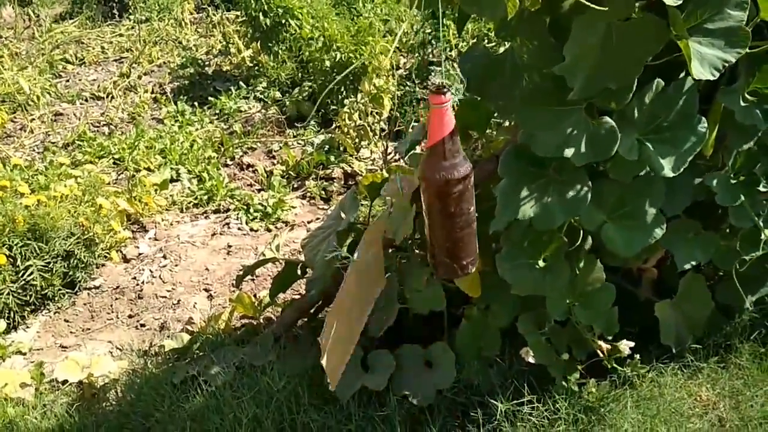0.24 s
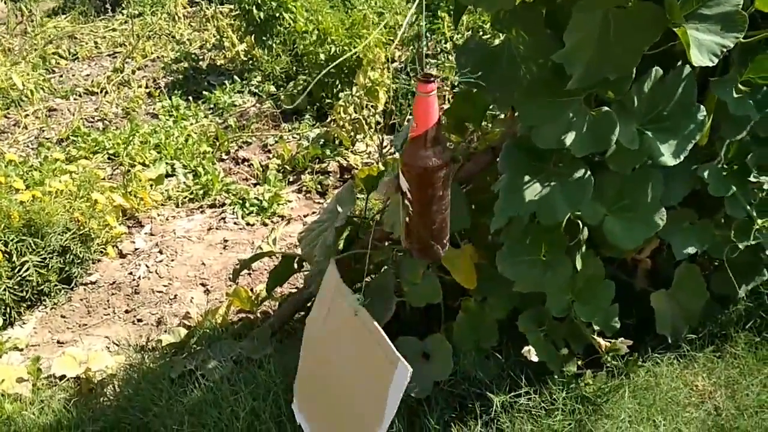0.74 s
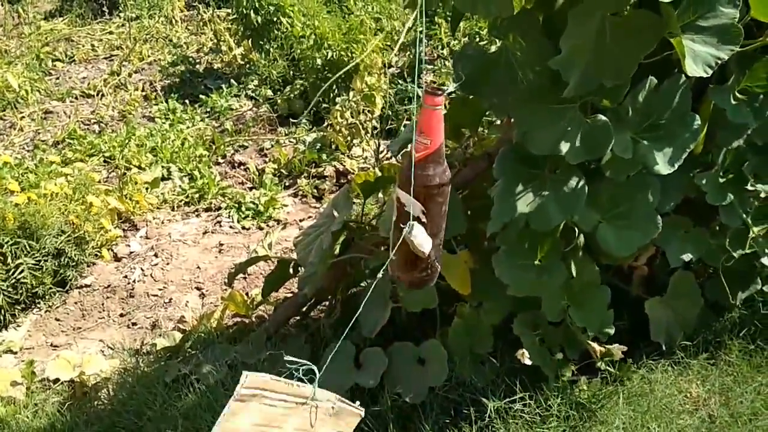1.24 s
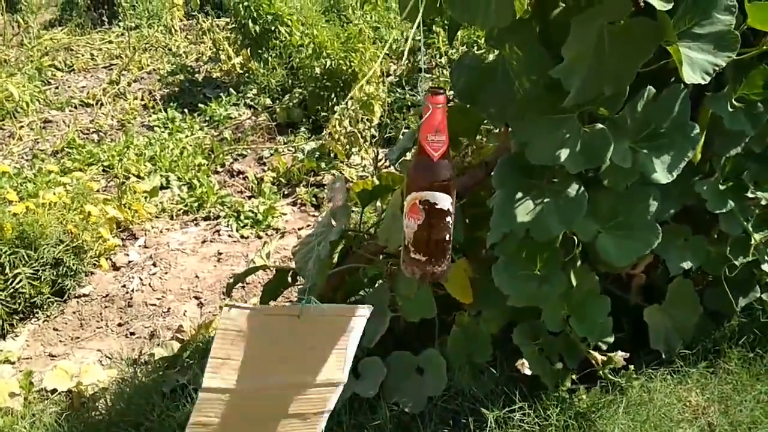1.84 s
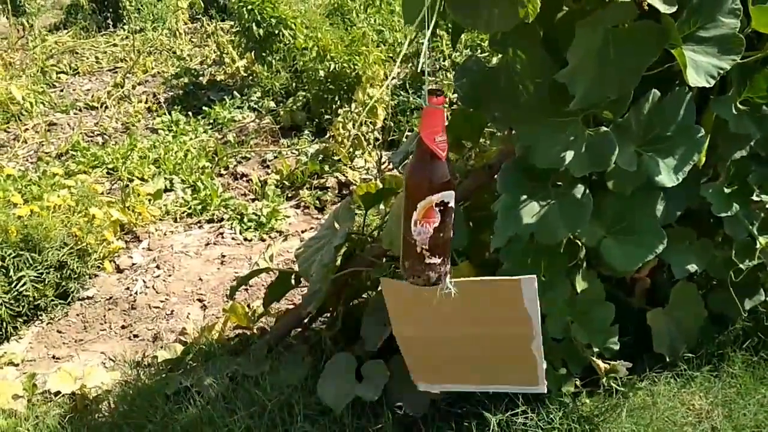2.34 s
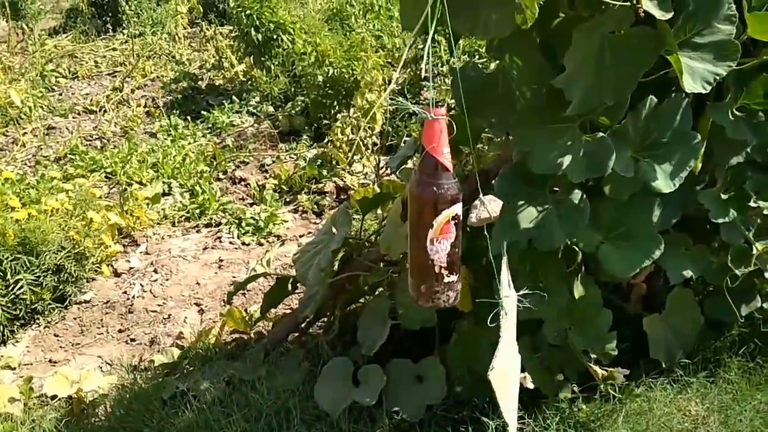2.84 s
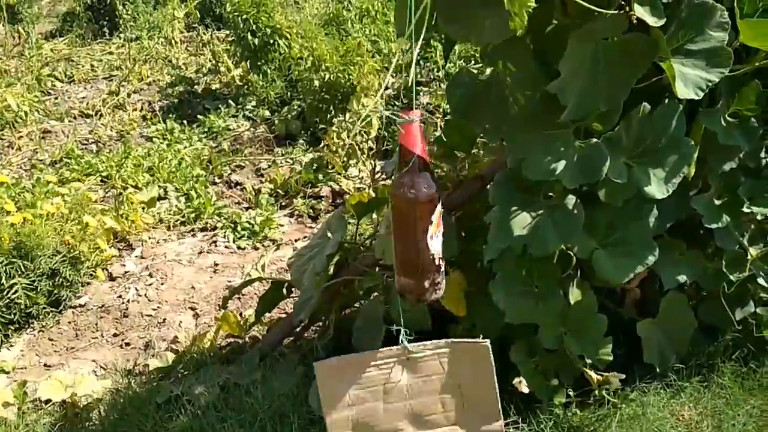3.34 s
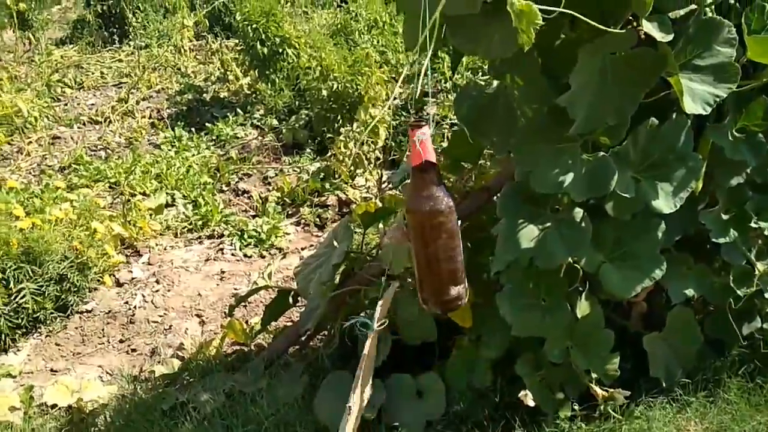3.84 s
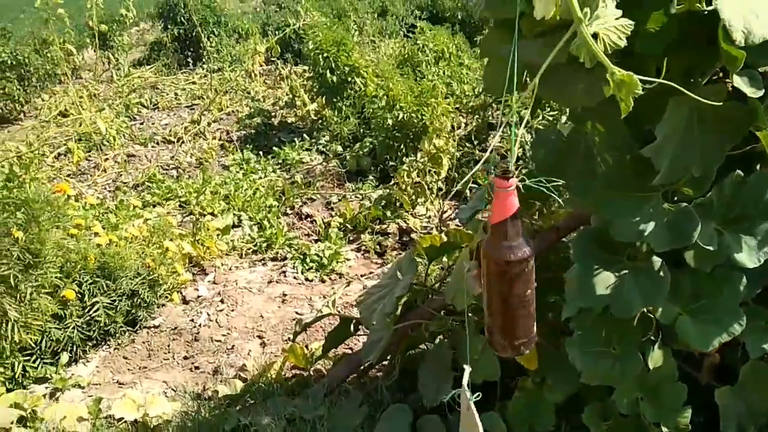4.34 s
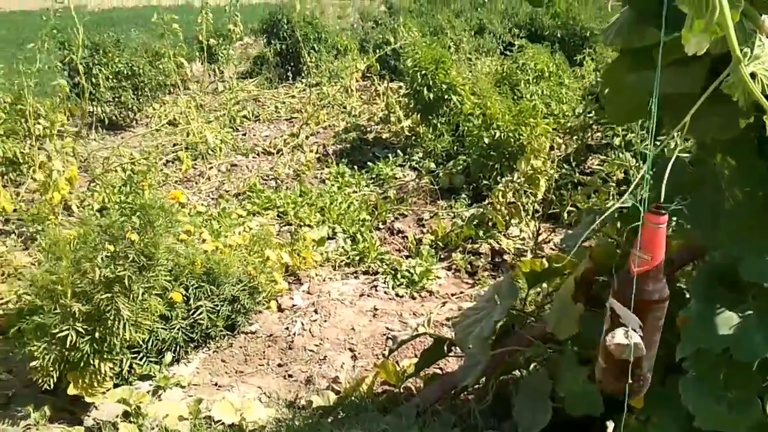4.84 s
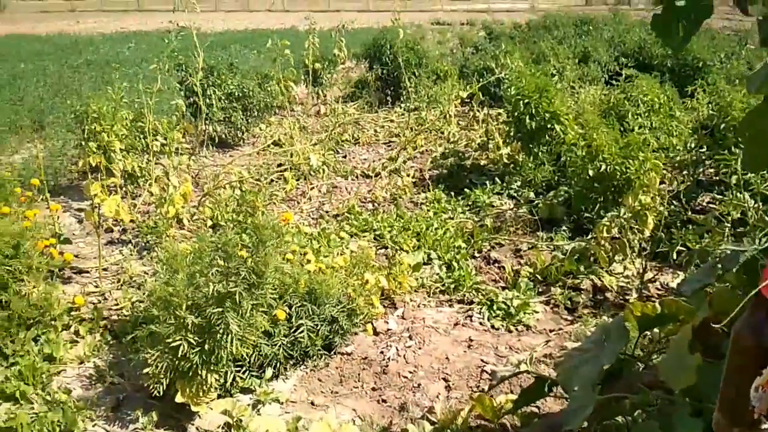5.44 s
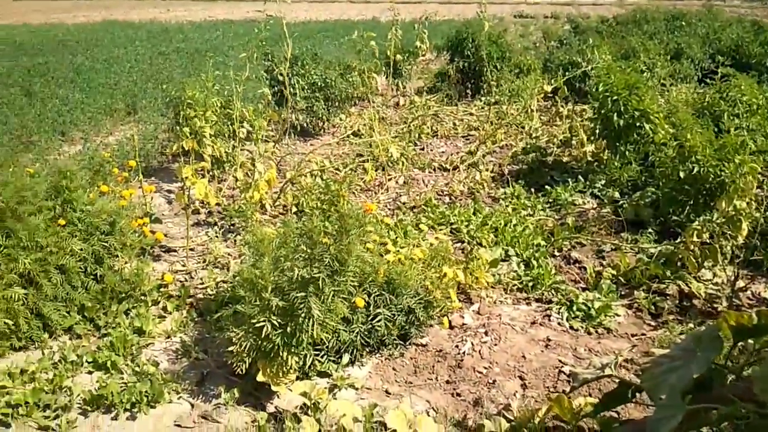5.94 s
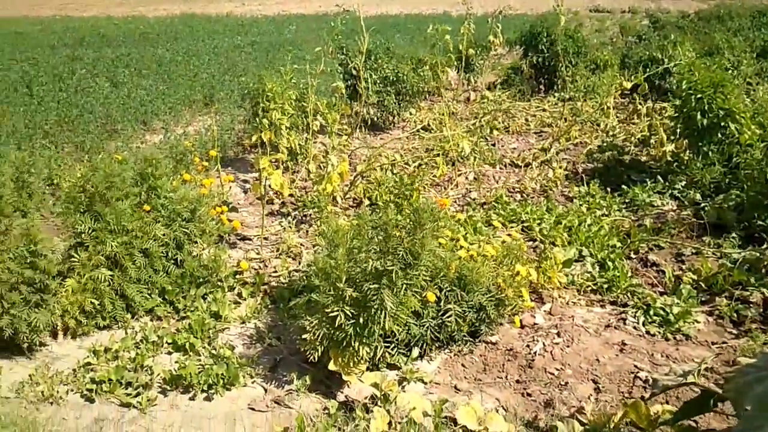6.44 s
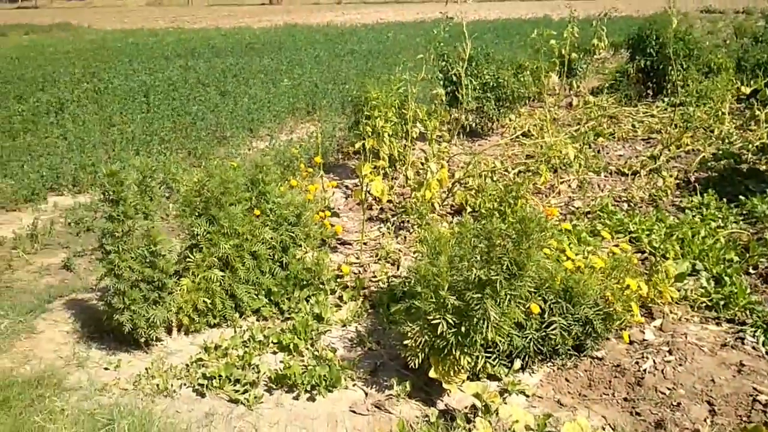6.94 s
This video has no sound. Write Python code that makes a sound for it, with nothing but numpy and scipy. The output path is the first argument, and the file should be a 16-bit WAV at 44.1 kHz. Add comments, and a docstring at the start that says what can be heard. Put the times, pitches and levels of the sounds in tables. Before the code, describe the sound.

Outdoors in a quiet field, wind thumps and rumbles against the microphone, strongest in the first two seconds. A stone strikes a hanging glass bottle with dry, bright, quickly fading clinks, unevenly spaced, some followed by tiny chattering rebounds. The middle is calmer, with clearer clinks; later come light puffs, a dull bump at right, faint cricket ticks and weak rattles with a short scrape. The sound sits almost entirely on the left.

```python
"""First a puff of wind rumbles at the left over a thin insect hiss; soon a stone clinks on a glass bottle.
The bottle hangs on a string in a field, and the stone, swung by a cardboard sail, strikes and chatters.
Each touch is a push of air, a crack of noise and decaying sines; ground and leaves answer softly.
Wind, hiss, ticks and the drone far away are shaped noise; a faint far whine is a few blurred tones.
Gusts buffet the microphone, whose right port is nearly deaf but takes one bump."""
import sys
import numpy as np
from scipy import signal
from scipy.fft import rfft, irfft, next_fast_len
from scipy.io import wavfile
from scipy.ndimage import uniform_filter1d, map_coordinates

SR = 44100
rng = np.random.default_rng(int(sys.argv[2]) if len(sys.argv) > 2 else 0)


def wrap_up_sound(samples):
    """Save the sound to the file named by the first command line argument, as 16-bit audio."""
    columns = np.atleast_2d(samples).T
    # keep every value between -1 and 1, then stretch to whole-number steps
    tamed = np.clip(columns, -1, 1)
    steps = np.round(tamed * 32767).astype(np.int16)
    wavfile.write(sys.argv[1], SR, steps)


N = 316197  # length of the scene in samples


def amp(db):
    """Turn decibels into a gain."""
    return 10 ** (np.asarray(db) / 20)


def unit(x):
    """Scale a sound to rms 1."""
    return x / np.sqrt(np.mean(x ** 2) + 1e-20)


def along(points, hz):
    """Read a curve of (frequency [Hz], value) points, with frequency on a log axis."""
    point_hz, value = np.transpose(points)
    return np.interp(np.log(hz + 1), np.log(point_hz + 1), value)


def curve(rows):
    """Join (time [s], level [dB]) rows into one gain per sample, silent outside them."""
    return amp(np.interp(np.arange(N) / SR, *np.transpose(rows), left=-np.inf, right=-np.inf))


def wobble(rate):
    """Draw a smooth random curve with this many knots a second."""
    knots = rng.standard_normal(int(N * rate / SR) + 4)
    return map_coordinates(knots, [np.arange(N) * rate / SR])


def filtered(x, response):
    """Multiply the spectrum of a sound by a response of frequency."""
    size = next_fast_len(N + SR // 2)
    spectrum = rfft(x, size) * response(np.fft.rfftfreq(size, 1 / SR))
    return irfft(spectrum, size)[..., :N]


def noise(spectrum):
    """Make coloured noise of rms 1."""
    return unit(filtered(rng.standard_normal(N), lambda hz: amp(along(spectrum, hz))))


def add(track, s, sound):
    """Mix a sound into a track from time s on."""
    start = max(round(s * SR), 0)
    track[start:start + len(sound)] += sound[:N - start]


def envelope(s, db, rise_s, fall_s, hold_s=0):
    """Gain that peaks at time s and holds; rise and fall are the times for 20 dB."""
    t = np.arange(N, dtype=np.float32) / SR - s
    away = np.maximum(-t / rise_s, 0) + np.maximum((t - hold_s) / fall_s, 0)
    return amp(db) * np.exp(-np.log(10) * np.minimum(away, 20))


# colour of the air over the field: (frequency [Hz], relative level per Hz [dB])
FIELD_COLOUR = [(20, 3), (100, 2), (250, -13.5), (600, -15.5), (1100, -19.5), (2000, -28.5), (3500, -37.5),
                (9000, -33), (11000, -39), (16000, -42)]


def field_air():
    """Air noise, made patchy by random swells that differ over time and pitch."""
    z = signal.stft(noise(FIELD_COLOUR), nperseg=1024)[2]
    patches = uniform_filter1d(rng.standard_normal(z.shape), size=4, axis=0)  # neighbouring pitches
    patches = unit(uniform_filter1d(patches, size=12, axis=1))  # neighbouring moments
    bands_hz = np.linspace(0, SR / 2, len(z))
    depth_db = along([(100, 0.85), (500, 2.8), (1400, 4), (3000, .5)], bands_hz)
    patchy = signal.istft(z * amp(depth_db[:, None] * patches), nperseg=1024)[1][:N]
    return amp(-74.5 + 0.35 * wobble(7.4)) * patchy


# colour of the far drone: (frequency [Hz], relative level per Hz [dB])
DRONE_COLOUR = [(15, -35), (33, -15), (44, 2), (56, -15.5), (90, -20), (200, -44), (600, -88.5)]


def drone():
    """A steady low drone: noise gathered in a narrow low band."""
    return amp(-65.5) * noise(DRONE_COLOUR)


# swells of the far whine, before blurring:
#   (peak time [s], length between the points 20 dB down [s], pitch [Hz], peak level [dB])
WHINE_SWELLS = [(.56, .4, 1253, -73), (.72, .2, 946.4, -75), (1.25, 0.31, 954, -71.5),
                (1.44, 0.38, 885, -69), (2.67, 0.55, 935, -79), (3.63, 0.2, 927, -82)]


def far_whine():
    """Faint tones that come and go, blurred by multiplying them with slow noise."""
    t = np.arange(N) / SR
    whine = np.zeros(N)
    for s, length_s, hz, db in WHINE_SWELLS:
        whine += envelope(s, db, length_s / 2, length_s / 2) * np.sin(2 * np.pi * hz * t)
    blur = noise([(5, 2.5), (35, -3.5), (100, -15), (250, -25.5), (500, -90.5)])
    return blur * whine


# thin hiss of insects, before its flutter: (time [s], time held at full level [s], level [dB])
INSECT_HISSES = [(0, 0.76, -76.5), (1.265, 0.027, -78), (1.82, .005, -80)]
# ticks of a bush cricket, before a shared lift: (time [s], level [dB])
CRICKET_TICKS = [(6.374, -65), (6.4432, -56.5), (6.5124, -50.5), (6.582, -55), (6.6495, -59),
                 (6.7187, -63.5)]
# colour of both: (frequency [Hz], relative level per Hz [dB])
HISS_COLOUR = [(6000, -38), (9000, -20.5), (11500, -19.5), (12300, 1.5), (15000, 2), (16000, -5.5)]


def insects():
    """A thin fluttering hiss, and later a short even row of very high ticks, all cut from one noise."""
    ticks = np.zeros(N)
    t = np.arange(SR // 20) / SR
    snap = t / 0.0019 * np.exp(1 - t / 0.00044)
    tail = amp(-29.0) * np.exp(-t / 0.01)
    for s, db in CRICKET_TICKS:
        add(ticks, s - .001, amp(db + 9) * (snap + tail))
    hiss = np.zeros(N)
    for s, length_s, db in INSECT_HISSES:
        hiss += envelope(s, db, rise_s=.02, fall_s=0.031, hold_s=length_s)
    flutter = amp(1.2 * wobble(150))
    return (hiss * flutter + ticks) * noise(HISS_COLOUR)


# colours of slow and fast air at a port: (frequency [Hz], relative level per Hz [dB])
BREEZE_COLOUR = [(10, -5), (30, 3.5), (60, -4), (110, -14.5), (200, -29.5), (400, -45), (1000, -60),
                 (3000, -87)]
GALE_COLOUR = [(10, -8.5), (40, 4.5), (110, -2), (200, -17.5), (320, -29), (500, -44), (1000, -69),
               (3500, -102)]


def buffet(db, gale_db, lumps_db):
    """Turbulence at one port: faster air is louder with another colour, and its middle range spurts."""
    share = 1 / (1 + np.exp((gale_db - db) / 6))  # at gale_db, breeze and gale are equal
    flow = np.sqrt(1 - share) * noise(BREEZE_COLOUR) + np.sqrt(share) * noise(GALE_COLOUR)
    power = uniform_filter1d(uniform_filter1d(flow ** 2, size=1800), size=1800)
    swell = np.sqrt(np.abs(power))  # dividing by this makes the level follow db
    fine = filtered(flow, lambda hz: hz ** 4 / (hz ** 4 + 200 ** 4) / (1 + (hz / 550) ** 4))
    spurts = unit(amp(lumps_db * wobble(55)))
    return amp(db) * (flow + fine * (spurts - 1)) / swell


# two long gusts, a list of rows each, before the port settings below: (time [s], strength [dB])
LONG_GUSTS = [
    [(0.4, -82), (0.476, -45), (0.7, -20), (0.782, -31.5), (0.804, -22.5), (0.836, -37.5), (0.874, -27),
     (1.172, -46), (1.19, -36.5), (1.3, -33.5), (1.37, -58), (1.456, -39.5), (1.608, -32), (1.8, -75)],
    [(5.5, -71), (5.574, -43), (5.71, -43), (5.728, -54.5), (5.842, -52.5), (5.912, -60), (5.958, -44.5),
     (6.13, -71.5), (6.42, -46.5), (6.458, -60.5), (6.534, -44.5), (6.646, -75), (6.718, -46), (6.85, -72)],
]
GUST_LEFT_DB, GUST_RIGHT_DB = 6, -18.5  # how hard they hit each port
CALM_LEFT_DB, CALM_RIGHT_DB = -71.5, -77  # light air that is always there, before its swing
CALM_SWING_DB = 4
# short separate puffs:
#   (peak time [s], length between the points 20 dB down [s], left level [dB], right level [dB])
WIND_PUFFS = [(.005, 0.12, -35, -44), (0.095, 0.063, -35, -65), (0.262, 0.12, -32, -55),
              (1.85, 0.079, -52.5, -68), (1.96, 0.073, -53, -69), (3.65, 0.12, -61, -50.5),
              (3.87, .13, -51.5, -78), (3.962, 0.14, -40.5, -70), (4.3, .15, -50.5, -75),
              (4.647, 0.19, -53, -55.5), (5.064, 0.094, -44.5, -75), (5.222, 0.098, -37.5, -53),
              (5.375, 0.36, -42.5, -52.5), (6.89, .1, -51, -75), (7.091, 0.1, -45.5, -70)]
PUFF_RISE = .42  # share of a puff's length that it spends rising
# the strongest eddies that hit the left port: (peak time [s], frequency [Hz], peak level [dB])
LEFT_EDDIES = [(.251, 55, -16.5), (.271, 45, -21), (0.637, 60, -16), (.678, 70, -14.5), (.705, 70, -8.5),
               (0.7112, 150, -20.5), (.741, 40, -12), (0.8036, 65, -8), (.888, 75, -18), (.923, 45, -11.5),
               (0.964, 40, -15), (.984, 55, -15.5), (1.222, 35, -20), (1.283, 38, -13.5),
               (1.609, 40, -19.5), (6.76, 105, -44)]


def wind():
    """Gusts, puffs and light air rumble at both ports; single eddies push or pull sharply at the left."""
    gust = sum(curve(rows) for rows in LONG_GUSTS)
    # the layers of wind add up as powers
    left_power = (amp(GUST_LEFT_DB + 1.9 * wobble(22)) * gust) ** 2
    left_power += amp(CALM_LEFT_DB + CALM_SWING_DB * wobble(5)) ** 2
    right_power = (amp(GUST_RIGHT_DB + 3.1 * wobble(14)) * gust) ** 2
    right_power += amp(CALM_RIGHT_DB + CALM_SWING_DB * wobble(9)) ** 2
    for s, length_s, left_db, right_db in WIND_PUFFS:
        puff = envelope(s, 0, PUFF_RISE * length_s, (1 - PUFF_RISE) * length_s)
        left_power += (amp(left_db) * puff) ** 2
        right_power += (amp(right_db) * puff) ** 2
    left = buffet(10 * np.log10(left_power), gale_db=-26, lumps_db=8.0)
    right = buffet(10 * np.log10(right_power), gale_db=-54, lumps_db=6)
    t = np.arange(SR // 8) / SR - 1 / 16
    for s, hz, db in LEFT_EDDIES:
        u = (2 * np.pi * hz * t) ** 2
        shape = np.hanning(len(t)) * (1 - u) / (1 + u) ** 2
        add(left, s + t[0], rng.choice([-1, 1]) * amp(db) * shape)
    return np.array([left, right])


BUMP_S, BUMP_DB, RUB_DB = 5.342, -20.5, -49  # time [s] and peak levels [dB]
# colour of the bump: (frequency [Hz], relative level per Hz [dB])
THUD_COLOUR = [(15, -6), (50, 8), (110, -16), (200, -24.5), (400, -43), (700, -34), (1200, -53),
               (3000, -60), (7000, -58.5), (9000, -63), (15000, -75)]


def port_bump():
    """A dull bump against the right port with a short, much weaker rub after it, cut from one noise."""
    bump = envelope(BUMP_S, BUMP_DB, rise_s=.0037, fall_s=.018)
    rub = envelope(BUMP_S, RUB_DB, rise_s=0.0038, fall_s=0.026, hold_s=0.063)
    return (bump + rub) * noise(THUD_COLOUR)


# echo from the foliage: (frequency [Hz], time to fade by 60 dB [s])
LEAF_FADES = [(300, 0.078), (1500, 0.051), (5000, 0.21), (14000, 0.086)]
GROUND_S = .0099  # delay of the bounce off the ground [s]


def echo(x, wet_db, ground_s, ground_db):
    """One bounce off the ground, and a short noisy scatter from the leaves."""
    hz, t, z = signal.stft(rng.standard_normal(SR // 5), SR, nperseg=256)
    fade = amp(-60 * t / along(LEAF_FADES, hz)[:, None])
    tail = signal.istft(z * fade, SR, nperseg=256)[1]
    response = amp(wet_db) * tail / np.linalg.norm(tail)
    response[0] = 1  # the direct sound
    response[round(ground_s * SR)] += amp(ground_db)
    return signal.fftconvolve(x, response)


DRAG_S, DRAG_DB, DRAG_FADE_S = 6.7, -73, 0.32  # the level is before the uneven wobble
# colour of the drag: (frequency [Hz], relative level per Hz [dB])
SCRAPE_COLOUR = [(200, -19.5), (700, -6), (1400, 7.5), (2400, -6), (3500, -24), (7000, -21), (11000, -24),
                 (15000, -25.5)]


def drag():
    """The stone drags over the bottle: scraping noise of uneven level that dies away."""
    level = envelope(DRAG_S, DRAG_DB, rise_s=0.015, fall_s=DRAG_FADE_S)
    return level * amp(2.9 * wobble(120)) * noise(SCRAPE_COLOUR)


# ways the glass can ring (modes):
#   (frequency [Hz], level within its family [dB], first decay: time to fade by 60 dB [s])
GLASS_MODES = [(2640, 0, .19), (2650, 0, .235), (4005, 0, .14), (4073, 0, .13), (4769, 0, .092),
               (4899, 3.5, .098), (4996, -5, .11), (5084, -8, .11), (6686, -7, .13), (7626, -2, .12),
               (7720, -5, .12), (8627, 1, .1), (8764, 0, .095), (9558, 0, .11), (9734, 1, .1),
               (9824, -2, .1), (9899, -1, .1), (11187, -4, .12), (11409, -5, .12), (11860, 0, .1),
               (11965, 3, .11), (12730, -1, .11), (12790, 1, .1), (13635, 0, .1), (13757, -1, .1),
               (13975, 3, .1), (14082, -4, .1), (14273, 2, .1), (14628, -5, .1), (15186, 0, .09),
               (15524, -3, .08)]
# borders between families of modes: frequency [Hz]; the struck spot decides how hard each rings
FAMILY_BORDERS = [2645, 3500, 4040, 4400, 4830, 6000, 9200, 10500, 13000]


def ring(family_db, scatter_db, after_db=-24, after_life=2.3):
    """The bottle's modes after one touch: a quick decay, and a weak longer aftersound in the second pair."""
    hz, db, t60 = np.transpose(GLASS_MODES).astype(np.float32)
    t = np.arange(SR * 2 // 5, dtype=np.float32) / SR
    family = np.searchsorted(FAMILY_BORDERS, hz)
    crowded = np.bincount(family)[family] > 1  # modes that share a family vary from blow to blow
    scatter = scatter_db * crowded * rng.standard_normal(len(hz))
    size = amp(db + np.asarray(family_db)[family] + scatter)
    size *= rng.choice([-1, 1], len(hz))  # each mode starts upward or downward at random
    age = float(np.log(1000)) * t / t60[:, None]
    fade = np.exp(-age)
    second_pair = (hz > FAMILY_BORDERS[1]) & (hz < FAMILY_BORDERS[3])
    fade[second_pair] += amp(after_db) * np.exp(-age[second_pair] / after_life)
    # the lowest pair takes a few ms to build up
    fade[hz < FAMILY_BORDERS[1]] *= 1 - 0.35 * np.exp(-t / 0.0071)
    return size.astype(np.float32) @ (fade * np.sin(2 * np.pi * hz[:, None] * t))


def click(s, hz):
    """The stone stops dead and pushes one cycle of air: (start time, sound of peak 1)."""
    u = 2 * np.pi * hz * (np.arange(SR // 100) / SR - 1 / 200)
    return s - 1 / 200, -u * np.exp((1 - u * u) / 2)


def contact(clicks, rings, s, hz, db, crack_db, family_db):
    """One touch of stone on glass: a dry click and a gritty crack in one track, the ring in another."""
    start, push = click(s, hz)
    t = np.arange(SR // 100) / SR
    age = np.maximum(t - (s - start), 0)
    crack = amp(crack_db) * (age > 0) * np.exp(-age / 0.0027) * rng.standard_normal(len(t))
    add(clicks, start, echo(amp(db) * push + crack, wet_db=-6.0, ground_s=GROUND_S, ground_db=-22.0))
    add(rings, s, ring(family_db, scatter_db=3.5))


# low modes come in pairs with lobes round the wall: (lobes [count], turn of the pattern [degrees])
LOBE_PAIRS = [(2, 0), (3, 42), (4, 30)]
NODE_DB = -26  # what is left of a mode that is struck on its node, its point of rest


def struck_at(degrees, pair_db):
    """Levels [dB] of both modes of each pair: where one has a lobe, its partner has a node."""
    lobes, turn = np.transpose(LOBE_PAIRS)
    phase = np.radians(lobes * degrees - turn)
    shares = np.hypot([np.cos(phase), np.sin(phase)], amp(NODE_DB))
    return (pair_db + 20 * np.log10(shares)).T.ravel()


# blows of the stone; click levels are before the click colour, ring levels before the spot's share:
#   (time [s], click frequency [Hz], click level [dB], spot round the wall [degrees], ring level [dB],
#   three-lobe pair, four-lobe pair and overtones against the ring [dB each], favoured overtones [Hz])
STONE_BLOWS = [(.041, 1040, -45.5, 97, -54.5, -10.5, -8, -35, 11830),
               (.8308, 1180, -17.5, 47, -22, -7, -2.5, -32, 12300),
               (1.5086, 1020, -20.5, 82, -30.5, -4.5, -16, -20.5, 14440),
               (2.1332, 1134, -18.5, 157, -21.5, -11.5, -6, -38, 7520),
               (2.4184, 1243, -26.5, 61, -31.5, -8, -8.5, -28, 14610),
               (3.0707, 1245, -24, 9.3, -27, -18.5, -16, -40, 7150),
               (3.184, 1500, -21.5, 82, -22.5, -16, -5.5, -28, 9730),
               (3.7758, 1815, -46.5, 10.5, -30, -12, -9.5, -29, 14400),
               (4.1412, 1080, -34.5, 126.5, -47, -5.5, -17, -27, 9750),
               (4.248, 1100, -37, 96, -44.5, -6, -2, -24, 6770),
               (5.143, 1297, -52, 5, -71.5, -21, -2, -32, 7500),
               (5.223, 1582, -24, 168, -27.5, -7.5, -7, -25, 8400),
               (6.4925, 1300, -52, 11.4, -55.5, -35, -22, -40, 7500)]
# centres of the four families of overtones: frequency [Hz]
OVERTONE_CENTRES = [7800, 9750, 11900, 14300]
FAVOUR_DB, FAVOUR_OCTAVES = 9.5, .15  # lift of the favoured overtones, and its width


def blows(clicks, rings):
    """The main blows; the spot that is struck decides which modes ring."""
    for s, hz, db, degrees, ring_db, three_db, four_db, over_db, bright_hz in STONE_BLOWS:
        octaves_off = np.log2(np.divide(OVERTONE_CENTRES, bright_hz))
        lift_db = FAVOUR_DB * np.exp(-(octaves_off / FAVOUR_OCTAVES) ** 2)
        pairs_db = struck_at(degrees, [0, three_db, four_db])
        family_db = ring_db + np.append(pairs_db, over_db + lift_db)
        crack_db = min(np.mean(family_db) - 2.5, db - 23.5)
        contact(clicks, rings, s, hz, db, crack_db, family_db)


# each flight against the one before, the shortest flight [s], unevenness of the later flights
FLIGHT_SHRINK, SHORTEST_FLIGHT_S, FLIGHT_SCATTER = .56, .014, 0.11


def rebounds(s, flight_s, count):
    """Contact times of a stone whose flights shrink to a shortest length and are a little uneven."""
    order = np.arange(count - 1)
    flights = np.maximum(flight_s * FLIGHT_SHRINK ** order, SHORTEST_FLIGHT_S)
    flights *= np.exp(FLIGHT_SCATTER * (order > 1) * rng.standard_normal(count - 1))
    return s + np.append(0, np.cumsum(flights))


# chatter along the glass; levels are for the first touch, before click colour and family offsets:
#   (time [s], first flight [s], loss a bounce [dB], click level [dB], ring level [dB],
#   upper ring level [dB])
CHATTERS = [(.08, .03, 29, -54, -71.5, -67), (0.147, .03, 33, -67, -90, -71),
            (.224, 0.026, 34, -64, -73, -85), (3.2304, .029, 4, -38.5, -49.5, -54.5),
            (3.821, 0.023, 33.5, -60.5, -51, -56), (4.207, .03, 35, -60.5, -63.5, -72),
            (4.2863, 0.025, 8.5, -37, -56, -64.5), (4.538, 0.029, 36.5, -66, -73, -100),
            (5.1654, 0.027, 35, -53, -79.5, -84), (5.2616, .031, 14, -34, -37.5, -54),
            (6.5131, .0184, 4.5, -46.5, -53.5, -81.5), (6.5838, .011, 6, -53, -72, -88),
            (6.699, .03, 17, -56.5, -84.5, -99), (6.873, .03, 34.5, -63, -71.5, -100)]
SPENT_DB = 30  # bounces end at this total loss, so a larger loss a bounce leaves one touch


def chatter(clicks, rings):
    """The stone rebounds and chatters along the glass, each touch weaker than the one before."""
    for s, flight_s, loss_db, db, low_db, upper_db in CHATTERS:
        pair = low_db + np.array([0, -8])
        upper = upper_db + np.array([-7.5, -11.5, -10.5, -1.5, -16.5, -10.0, -14.0, -21.5])
        family_db = np.append(pair, upper)
        for k, when in enumerate(rebounds(s, flight_s, count=6)):
            lost = k * loss_db
            if lost < SPENT_DB:
                contact(clicks, rings, when, 1150, db - lost, db - lost - 30.5, family_db - lost)


# colour laid over the clicks, cracks and their echoes: (frequency [Hz], gain [dB])
CLICK_TONE = [(100, -28.5), (250, -11.5), (450, -1.5), (1000, -1), (2500, 1), (3500, -0.5), (6000, -8.5),
              (15000, -14)]


def bottle():
    """Blows and chatter click, crack and ring the glass, with soft echoes; the dragging stone scrapes."""
    clicks, rings = np.zeros(N), np.zeros(N)
    blows(clicks, rings)
    chatter(clicks, rings)
    glass = echo(rings, wet_db=-18.5, ground_s=GROUND_S, ground_db=-27)[:N]
    return glass + filtered(clicks, lambda hz: amp(along(CLICK_TONE, hz))) + drag()


# colour of the right port's own steady noise: (frequency [Hz], relative level per Hz [dB])
SELF_NOISE_COLOUR = [(20, 4.5), (100, 3), (300, -14.5), (1000, -24.5), (2500, -31.5), (9000, -33),
                     (11000, -37.5), (16000, -39)]


def scene():
    """The left port hears the field; the right gets a trace of it, steady noise, its wind and one bump."""
    outside = field_air() + drone() + far_whine() + insects() + bottle()
    right = amp(-36.0) * outside + amp(-77) * noise(SELF_NOISE_COLOUR) + port_bump()
    return np.array([outside, right]) + wind()


TOP_HZ = 15950  # band limit of the recorder


def record(dry):
    """The recorder keeps nothing above its band limit."""
    return filtered(dry, lambda hz: hz < TOP_HZ)


dry = scene()
out = record(dry)
wrap_up_sound(out)
```